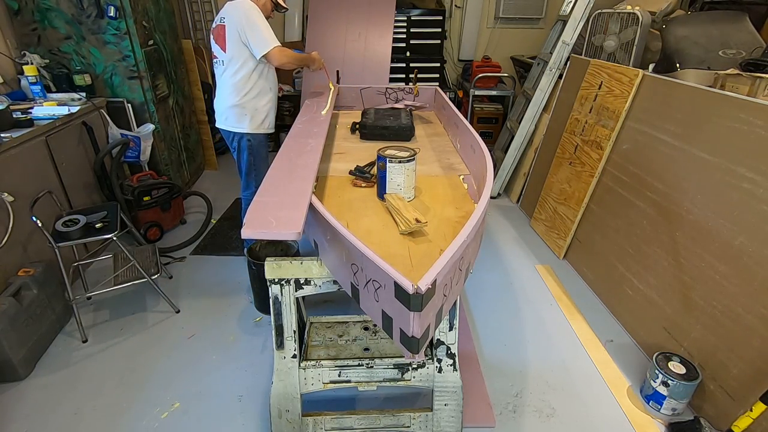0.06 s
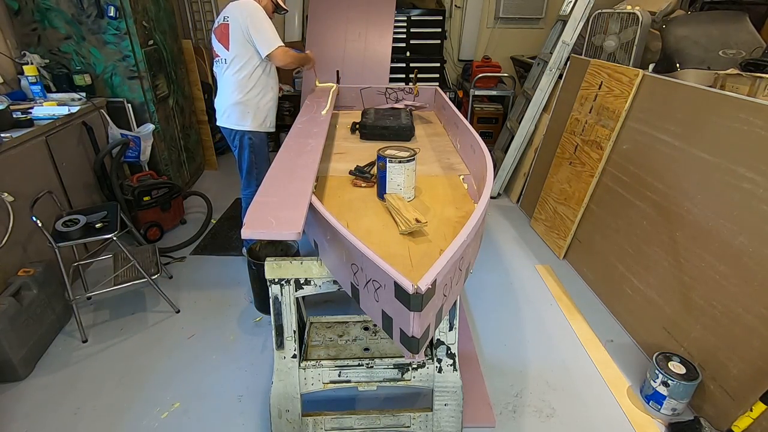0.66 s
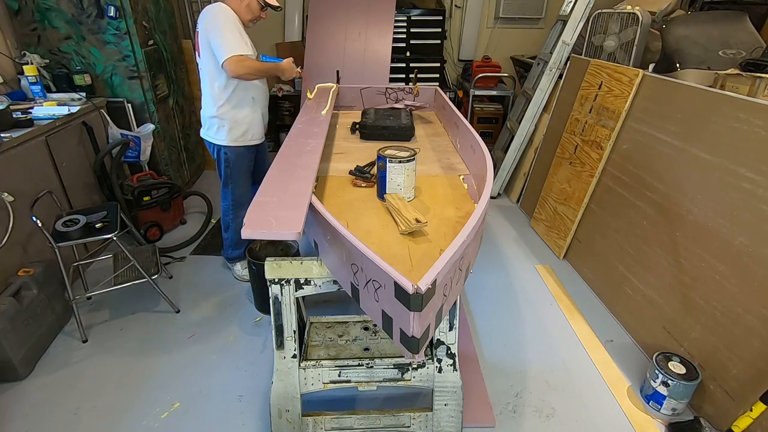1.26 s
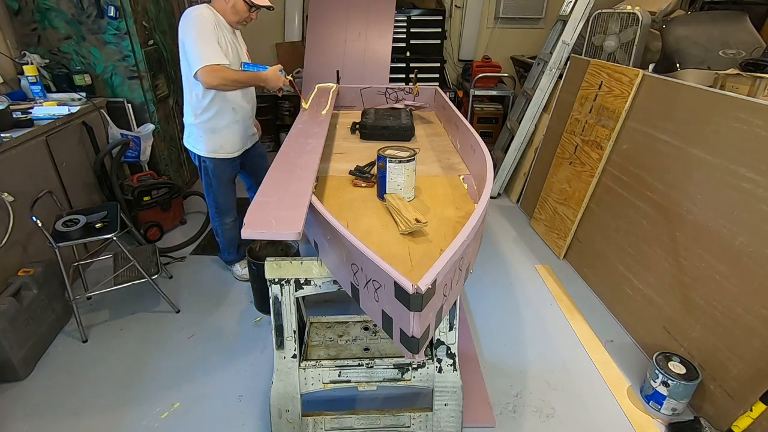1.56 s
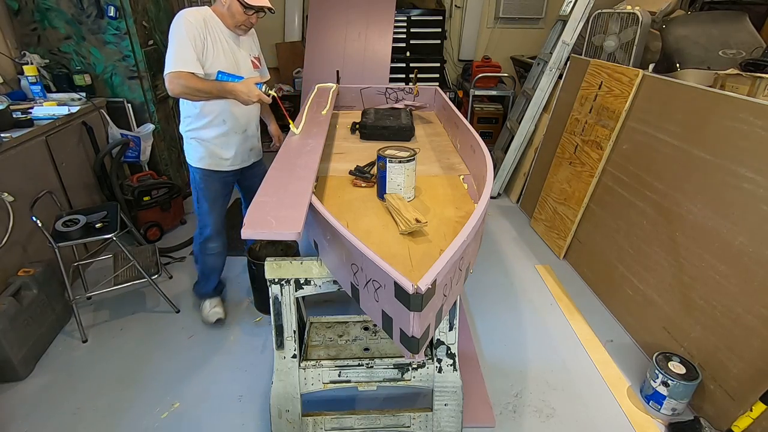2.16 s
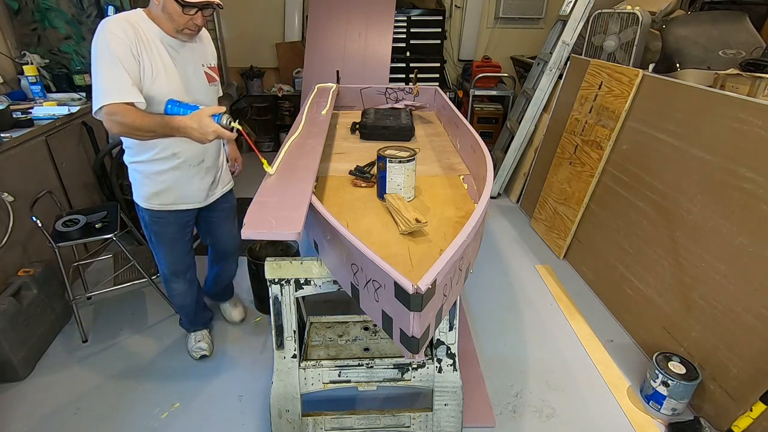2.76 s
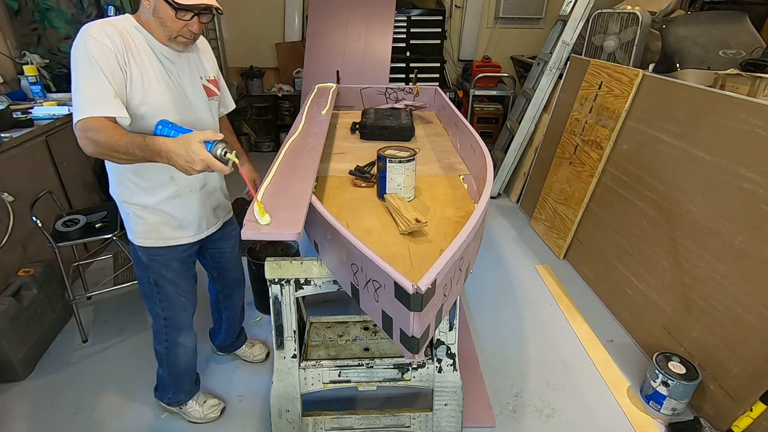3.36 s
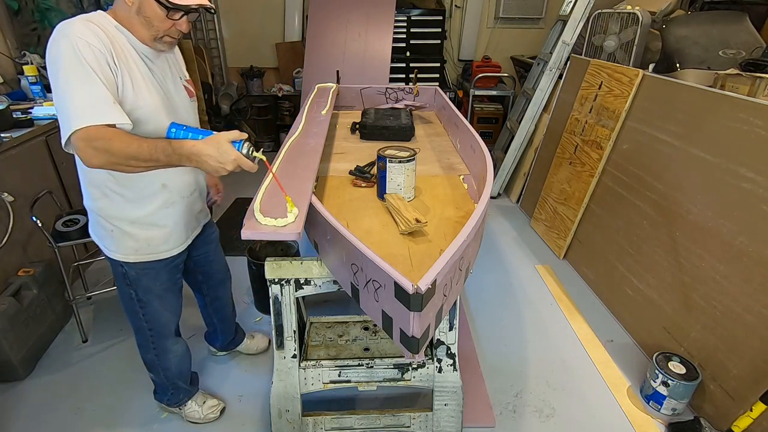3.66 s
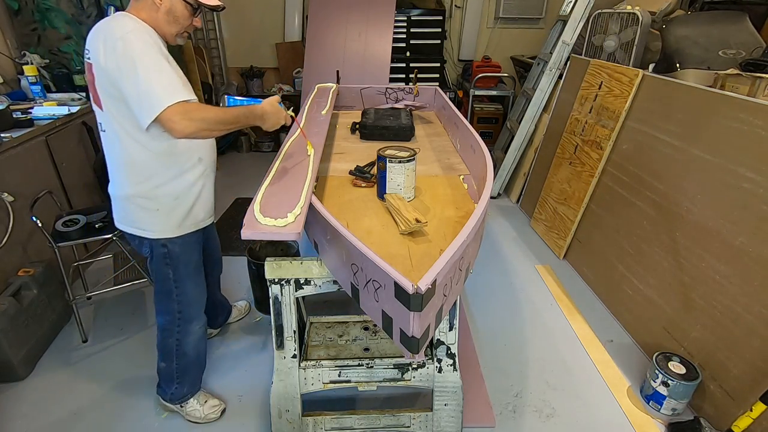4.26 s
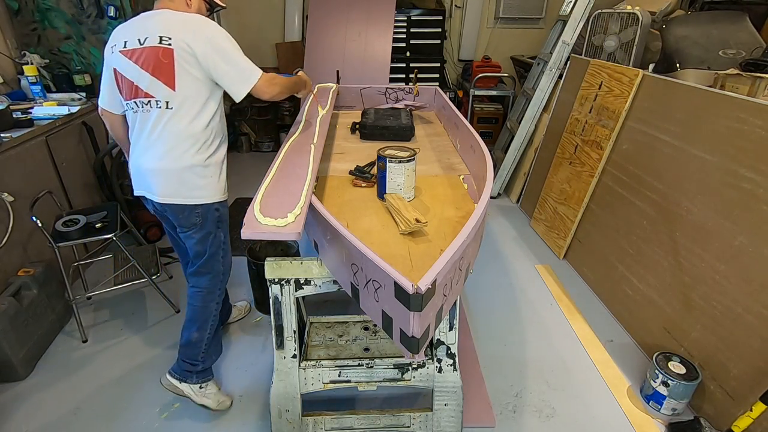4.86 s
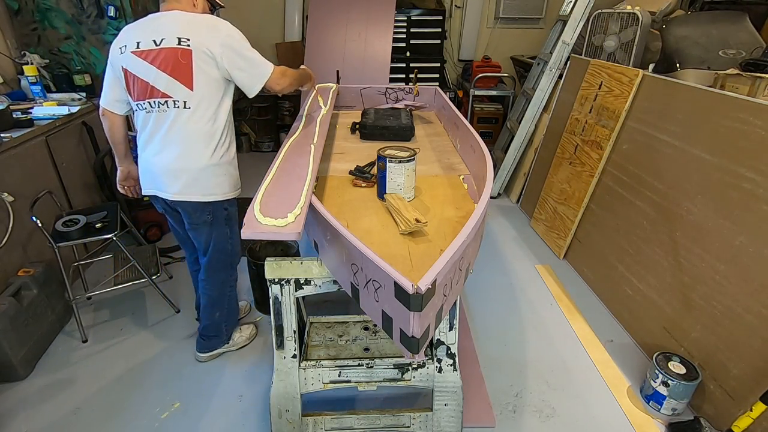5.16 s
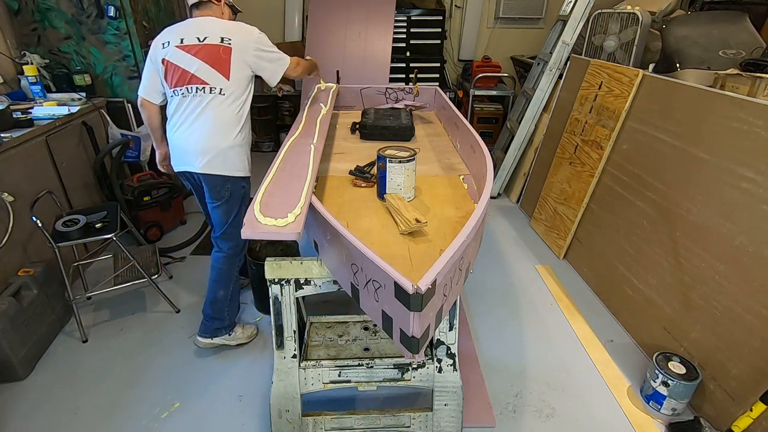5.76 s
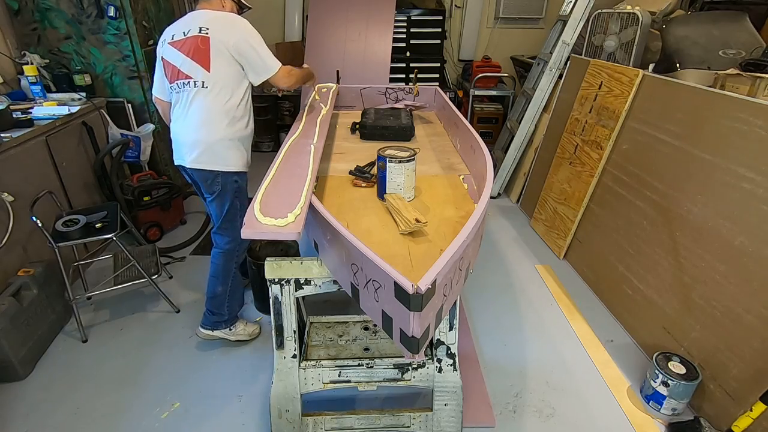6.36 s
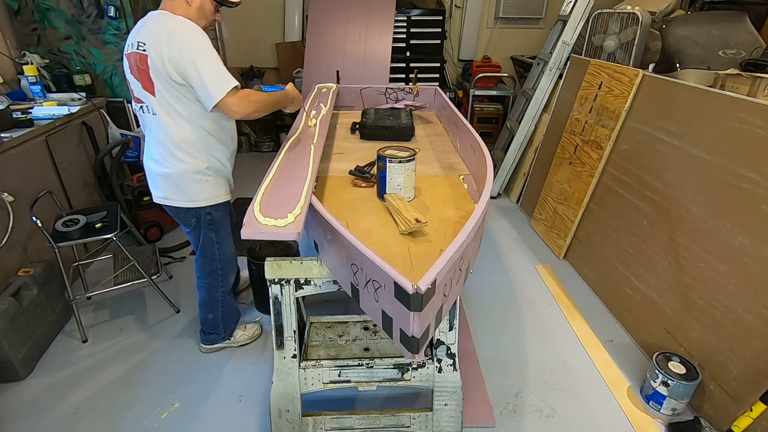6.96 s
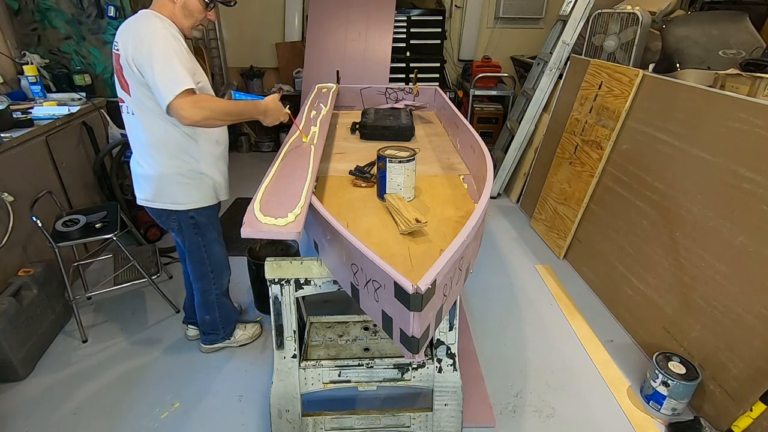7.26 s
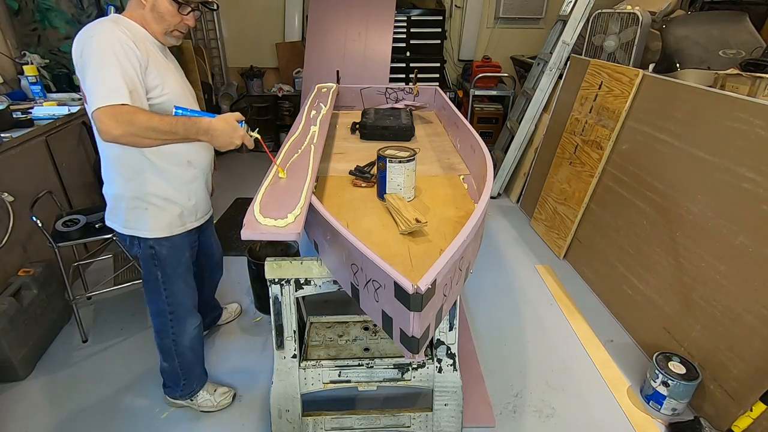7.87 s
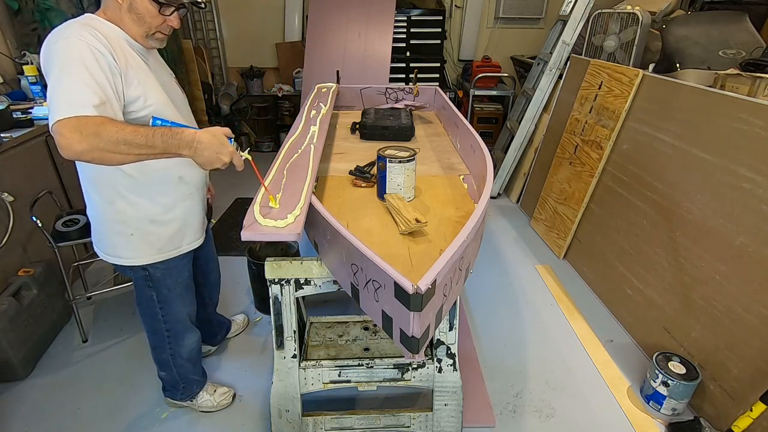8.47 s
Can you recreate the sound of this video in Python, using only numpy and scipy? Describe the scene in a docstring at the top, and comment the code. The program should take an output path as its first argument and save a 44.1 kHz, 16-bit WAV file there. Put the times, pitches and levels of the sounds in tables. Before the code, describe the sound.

Spray foam hisses and sputters through a straw, first steadily and then in short squirts, over a faint fan hum and soft steps.

```python
"""An aerosol can hisses as a man lays a bead of expanding foam along a foam-board boat in a workshop.
Gas rushes out of the straw in one long spray, then in weaker squirts, with a few sudden spits.
The hiss turns hollow as the tip nears the board, and the jet whistles in a dent it blows in the foam.
Gas pockets pop in the straw, shoes pad on the floor and a fan hums in the room."""
import sys
import numpy as np
from scipy import signal
from scipy.fft import rfft, irfft, next_fast_len
from scipy.io import wavfile

SR = 44100
rng = np.random.default_rng(int(sys.argv[2]) if len(sys.argv) > 2 else 0)


def master_out(mix):
    """Clip the mix to full scale and print it as 16-bit PCM to the path in sys.argv[1]."""
    frames = np.transpose(np.atleast_2d(mix))
    ceiling = np.clip(frames, -1, 1)
    pcm = np.round(ceiling * 32767).astype(np.int16)
    wavfile.write(sys.argv[1], SR, pcm)


N = 379701
TIME = np.arange(N) / SR


def from_db(db):
    """Turn decibels into a gain."""
    return np.exp(np.asarray(db) * np.log(10) / 20)


def rms_one(x):
    """Scale a sound to an average (rms) size of 1."""
    return x / np.sqrt(np.mean(x ** 2) + 1e-20)


def in_time(rows):
    """Join a table's rows with straight lines: one curve over time for each value column."""
    times, *columns = np.transpose(rows)
    return [np.interp(TIME, times, column) for column in columns]


def at_hz(rows, hz):
    """Read a table at any frequency, with octaves evenly spaced."""
    frequencies, values = np.transpose(rows)
    return np.interp(np.log(hz), np.log(frequencies), values)


def drift(rate):
    """A smooth random wobble of size 1 that changes about `rate` times a second."""
    step, warm_up = 20, 4000
    r = np.exp(-2 * np.pi * rate * step / SR)
    slow = signal.lfilter([1], [1, -2 * r, r * r], rng.standard_normal(N // step + warm_up + 2))
    slow = rms_one(slow[warm_up:])
    return np.interp(np.arange(N) / step, np.arange(len(slow)), slow)


def swell(start, rise):
    """A puff that peaks at 1 after its rise time and then dies away."""
    age = np.maximum(TIME - start, 0) / rise
    return age * np.exp(1 - age)


def squeeze(start, rise, hold, fall):
    """The valve opens smoothly and stays open, then the flow dies away."""
    opening = np.sin(np.pi / 2 * np.clip((TIME - start) / rise, 0, 1)) ** 2
    return opening * np.exp(-np.maximum(TIME - start - rise - hold, 0) / fall)


def swept_band(x, centre_hz, q, block=128):
    """Keep the sound near a moving pitch; a higher q keeps a narrower band."""
    out, state = np.zeros_like(x), np.zeros((2, 2))
    for i in range(0, N, block):
        angle = 2 * np.pi * centre_hz[i] / SR
        r = np.exp(-angle / (2 * q))
        gain = (1 - r * r) / 2
        feedback = [1, -2 * r * np.cos(angle), r * r]
        out[:, i:i + block], state = signal.lfilter([gain, 0, -gain], feedback, x[:, i:i + block], zi=state)
    return out


# how alike left and right sound (frequency [Hz], likeness [1 same, -1 opposite])
STEREO_LIKENESS = [(60, 0.63), (400, 0.96), (1000, 0.58), (1900, 0.6), (3700, 0.87), (4700, 0.85),
                   (6300, -0.1), (14000, -1)]
def noise_bands():
    """Stereo noise cut into slices a third of an octave wide, as (centre [Hz], noise) pairs."""
    edges = np.geomspace(22, 16500, 30)
    white, bands = rng.standard_normal((2, 2, N)), []
    for k, (low, high) in enumerate(zip(edges, edges[1:])):
        band_filter = signal.butter(2, [low, high], "band", fs=SR, output="sos")
        mid, side = signal.sosfilt(band_filter, white[k % 2])
        hz = np.sqrt(low * high)
        alike = np.clip(at_hz(STEREO_LIKENESS, hz), -1, 1)
        shared = np.sqrt((1 + alike) / 2) * mid
        opposed = np.sqrt((1 - alike) / 2) * np.array([side, -side])
        bands.append((hz, shared + opposed))
    return bands


# tone of the moving air in the room (frequency [Hz], relative level [dB])
AIR_COLOUR = [(25, -10), (60, -13), (85, -5), (105, -16), (140, 2.5), (220, 2.5), (310, -3.5), (420, -16),
              (700, -20.5), (1200, -27), (3000, -44), (7000, -32), (10500, -45), (15000, -56)]
# hum of the fan and the mains (pitch [Hz], level [dB])
HUM_TONES = [(59.2, -68), (211, -65), (310, -72.5)]
def fan(bands, air_db=-55.5, waver=0.42, waver_per_s=2.4):
    """A fan makes a dull rush of air and a few tones that swell and fade."""
    air = rms_one(sum(noise * from_db(at_hz(AIR_COLOUR, hz)) for hz, noise in bands))
    tones = 0
    for hz, db in HUM_TONES:
        phase = 2 * np.pi * hz * TIME
        tone = (1 + waver * drift(waver_per_s)) * np.sin(phase)
        tone += waver * drift(waver_per_s) * np.cos(phase)
        tones += from_db(db) * rms_one(tone)
    return from_db(air_db) * air + tones


# the man's steps (time [s], level [dB])
FOOTSTEPS = [(0.634, -47.5), (1.121, -48), (1.649, -50), (1.88, -49), (2.581, -51), (2.88, -50),
             (3.11, -65), (3.389, -54), (4.056, -53), (5.28, -50), (6.619, -55), (7.15, -62), (8.237, -47)]
def footfalls(floor_hz=60, rise_s=0.027, level_db=-1.0):
    """A soft sole pushes a short, low boom out of the floor."""
    return sum(from_db(db + level_db) * swell(start, rise_s) * np.sin(2 * np.pi * floor_hz * (TIME - start))
               for start, db in FOOTSTEPS)


# how long the room echoes (frequency [Hz], time to fade by 60 dB [s])
ECHO_TIMES = [(100, 0.52), (400, 0.62), (1500, 0.58), (6000, 0.55), (10000, 0.37), (14000, 0.38)]
def workshop(x, bands, direct_db=-3.0, echo_db=-4.5, build_s=0.0028):
    """The room adds fading echoes, whose pattern keeps changing as the man and the can move."""
    size, hop = SR // 2, SR // 10
    count, age = N // size, TIME[:size]
    tails = sum(noise[:, :count * size].reshape(2, count, size) * from_db(-60 * age / at_hz(ECHO_TIMES, hz))
                for hz, noise in bands)
    tails = rms_one(tails * np.minimum(age / build_s, 1)) / np.sqrt(size)
    padded = np.pad(x, ((0, 0), (hop, 2 * hop)), "reflect")
    echoes = np.zeros((2, N + size + 3 * hop))
    fade = signal.windows.cosine(2 * hop)
    for k, i in enumerate(range(0, N + hop, hop)):
        # at each new position, 50 groups of echoes are flipped at random
        signs = rng.choice([-1, 1], 50)[np.arange(size) * 50 // size]
        echo = signal.fftconvolve(padded[:, i:i + 2 * hop] * fade, tails[:, k % count] * signs, axes=1)
        echoes[:, i:i + echo.shape[1]] += echo
    return from_db(direct_db) * x + from_db(echo_db) * echoes[:, hop:hop + N]


# bursting gas pockets (time [s], level [dB], pitch [Hz], spread [octaves], fade [s])
GAS_POCKETS = [(1.860, -32, 200, 0.74, 0.0075), (1.866, -23.5, 4200, 0.25, 0.0017),
               (1.867, -37.5, 560, 0.36, 0.018), (1.884, -35, 400, 0.88, 0.014),
               (1.893, -34, 255, 0.31, 0.018), (2.96, -48.5, 271, 1.1, 0.082),
               (3.201, -45, 480, 0.83, 0.0086), (5.195, -45.5, 430, 0.99, 0.073),
               (5.54, -40, 475, 0.93, 0.05), (5.635, -47, 463, 1.2, 0.033), (6.52, -52.5, 240, 0.7, 0.067),
               (6.79, -52.5, 220, 0.48, 0.078), (6.97, -49, 333, 0.27, 0.009), (7.15, -52, 241, 1.3, 0.11),
               (7.58, -53, 282, 0.38, 0.14)]
def pops(bands, attack_share=0.032):
    """Each gas pocket in the straw bursts with a hollow pop; the shortest ones snap."""
    out = np.zeros((2, N))
    for start, db, pitch_hz, octaves, fade_s in GAS_POCKETS:
        span = slice(int(start * SR), int(start * SR) + SR // 2)
        body = sum(noise[:, span] * np.exp(-.5 * (np.log2(hz / pitch_hz) / octaves) ** 2) / np.sqrt(hz)
                   for hz, noise in bands)
        age = np.maximum(TIME[span] - start, 0) / fade_s
        envelope = (1 - np.exp(-age / attack_share)) * np.exp(-.5 * age ** 2)
        out[:, span] += from_db(db) * envelope * rms_one(body)
    return out


# notes of the hollow in the wet foam (base pitch [Hz], width [Hz], relative level [dB])
HOLLOW_NOTES = [(800, 94, 0.5), (970, 115, -6), (1456, 200, -2.5), (1900, 420, -2.5)]
# its whistles (time [s], rise [s], hold [s], fall [s], level [dB], favoured pitch [Hz], tuning [ratio])
HOLLOW_WHISTLES = [(6.108, 0.083, 0.057, 0.037, -47.5, 1350, 0.99),
                   (6.488, 0.05, 0.047, 0.029, -49.5, 1750, 1.05),
                   (7.388, 0.084, 0.12, 0.04, -50, 760, 1.06), (7.601, 0.064, 0.05, 0.1, -53.5, 990, 1.1),
                   (8.249, 0.12, 0.22, 0.1, -55, 1000, 1.07)]
def hollow(sag_octaves_per_s=0.255):
    """Swirling gas whistles in the hollow under the tip; the pitch sags as the jet widens it."""
    out = np.zeros(N)
    for start, rise, hold, fall, db, favoured_hz, tuning in HOLLOW_WHISTLES:
        span = slice(int(start * SR), int(start * SR) + int(.8 * SR))
        push = from_db(db) * squeeze(start, rise, hold, fall)[span]
        pitch_ratio = tuning * 2 ** (-sag_octaves_per_s * (TIME[span] - start))
        for hz, width_hz, note_db in HOLLOW_NOTES:
            smoother = signal.butter(2, width_hz / 2, fs=SR, output="sos")
            wobble = signal.sosfilt(smoother, rng.standard_normal((2, len(push))))
            phase = 2 * np.pi * hz * np.cumsum(pitch_ratio) / SR
            airy_note = rms_one(wobble[0] * np.cos(phase) + wobble[1] * np.sin(phase))
            drive = from_db(note_db) / (1 + np.log2(hz / favoured_hz) ** 2)
            out[span] += push * drive * airy_note
    return out


# sudden spits of gas (time [s], level [dB], rise [s], extra treble [dB])
GAS_SPITS = [(1.861, -29, 0.018, -6), (3.10, -39, 0.052, 3), (3.80, -35, 0.02, 6), (5.205, -43, 0.03, -2),
             (5.547, -36.5, 0.026, 2.5), (7.15, -38.5, 0.032, 3), (8.401, -39, 0.017, -1)]
def spits(bands):
    """Slugs of pure gas leave the straw as puffs of the spray's hiss, each with its own brightness."""
    out = 0
    for start, db, rise_s, treble_db in GAS_SPITS:
        tilt = [(6000, 0), (11000, treble_db)]
        hiss = sum(noise[:, :SR // 2] * from_db(at_hz(HISS_COLOUR, hz) + at_hz(tilt, hz))
                   for hz, noise in bands)
        looped = np.tile(rms_one(hiss), N // (SR // 2) + 1)[:, :N]
        out += from_db(db) * swell(start, rise_s) * looped
    return out


# flow through the straw in the long spray (time [s], level [dB], high fizz [dB])
LONG_FLOW = [(0.05, -36.5, 0), (0.57, -38.5, -2.5), (0.68, -35, -5.5), (0.9, -36, -2.5), (1.15, -35.5, -1),
             (1.45, -34, 0.5), (1.8, -33, -0.5), (2.28, -33.5, -1.5), (2.58, -32.5, 0.5),
             (2.82, -32.5, -0.5), (3.15, -32.5, 0.5), (3.36, -34.5, 0), (3.68, -34.5, -1.5),
             (3.9, -33.5, 3.5), (4.2, -32.5, 0.5), (4.98, -32.5, -0.5), (5.2, -35.5, -1)]
# ring of the air gap between tip and board (time [s], pitch [Hz], boost [dB])
TIP_GAP = [(0, 3470, 1), (.3, 3050, 2), (.55, 2400, 4.5), (.66, 4870, 0.5), (.9, 4630, 6), (1.2, 4400, 1),
           (1.6, 5670, 0), (2.2, 6500, 0.5), (2.53, 5600, 2.5), (2.85, 5960, -1), (3.08, 4900, 4.5),
           (3.2, 4330, 4), (3.32, 2960, 4), (3.43, 2050, 4), (3.62, 1990, 1.5), (3.77, 2300, 3),
           (3.9, 3130, 2), (4.25, 4430, 2), (4.7, 6300, -0.5), (5.2, 5770, -1)]
# short trigger pulls
# (time [s], rise [s], hold [s], fall [s], level [dB], gap pitch [Hz], low rush [dB], high fizz [dB])
SHORT_PULLS = [(6.017, 0.13, 0.7, 0.03, -53, 3620, 5, 4), (6.103, 0.12, 0.054, 0.02, -44, 1300, 12, 0),
               (6.462, 0.09, 0.043, 0.045, -40, 1900, 5.5, -1),
               (6.55, 0.094, 0.062, 0.23, -45.5, 2600, -0.5, -5),
               (6.721, 0.1, 0.11, 0.28, -38.5, 4700, 3, -6), (6.913, 0.17, 0.11, 0.33, -38.5, 4600, -1, -2),
               (7.19, 0.069, 0.32, 0.31, -43, 1400, 13, 0), (7.932, 0.038, 0.034, 0.69, -47.5, 990, 7, 4.5),
               (8.202, 0.21, 0.25, 0.10, -44.5, 1160, 7, -8)]
def trigger(long_pull_s=5.235, valve_close_s=0.12, long_rush_db=1):
    """Trigger pulls set the jet's strength and tone; where they overlap, the stronger one counts more."""
    flow_db, long_fizz_db = in_time(LONG_FLOW)
    long_gap_hz, boost_db = in_time(TIP_GAP)
    long_pull = from_db(flow_db) * np.exp(-np.maximum(TIME - long_pull_s, 0) / valve_close_s)
    powers = [long_pull ** 2 + 1e-20]
    colours = [(np.log(long_gap_hz), long_rush_db, long_fizz_db)]
    for start, rise, hold, fall, db, gap_hz, rush_db, fizz_db in SHORT_PULLS:
        powers.append((from_db(db) * squeeze(start, rise, hold, fall)) ** 2)
        colours.append((np.log(gap_hz), rush_db, fizz_db))
    total = sum(powers)
    log_gap, rush_db, fizz_db = (sum(power * value for power, value in zip(powers, column)) / total
                                 for column in zip(*colours))
    return np.sqrt(total), np.exp(log_gap), boost_db * powers[0] / total, rush_db, fizz_db


# tone of the gas leaving the straw (frequency [Hz], relative level [dB])
HISS_COLOUR = [(180, -31), (300, -20.5), (400, -14.5), (540, -12), (800, -7.5), (1200, -6.5), (2100, -3),
               (4000, -4), (5300, -3.5), (6500, 8), (8500, -17), (10000, -5), (11800, -23), (14500, -39)]
def spray(bands, level_db=2.0, gap_q=1.57, muffle_db_per_octave=3,
          sputter_db=1.0, flicker_db=1.5, extra_fizz_db=1.0):
    """The jet hisses and the board adds a low rush; the gap rings at one pitch and muffles those above."""
    strength, gap_hz, boost_db, rush_db, fizz_db = trigger()
    hiss, power = 0, 0
    for hz, noise in bands:
        rush_share = at_hz([(200, 1.0), (1100, 0.92), (3200, 0.068)], hz)
        fizz_share = at_hz([(5800, 0.029), (10000, 1.3), (14000, 2.4)], hz)
        colour_db = at_hz(HISS_COLOUR, hz) + rush_share * rush_db + fizz_share * (fizz_db + extra_fizz_db)
        octaves_above_gap = np.maximum(np.log2(hz / gap_hz), 0)
        gain = from_db(colour_db - muffle_db_per_octave * octaves_above_gap)
        power += np.mean(noise ** 2) * gain ** 2
        hiss += noise * gain * from_db(flicker_db * drift(rate=19))
    jet = hiss / np.sqrt(power)
    jet += (from_db(boost_db) - 1) * swept_band(jet, gap_hz, gap_q)
    # froth in the straw chokes the whole jet in quick, uneven flutters
    return (strength * jet + hollow()) * from_db(level_db + sputter_db * drift(rate=180))


def scene(close_pop_db=-11.5):
    """The can sounds in the workshop, over the fan and the steps."""
    jet_noise = noise_bands()
    room_noise = [(hz, np.roll(noise, N // 2, axis=1)) for hz, noise in jet_noise]
    hiss_noise = jet_noise[7:]   # no deep bass
    bursts = pops(jet_noise)
    can = spray(hiss_noise) + bursts + spits(hiss_noise)
    close_pops = from_db(close_pop_db) * bursts   # the pops echo less than the hiss
    return workshop(can, room_noise) + close_pops + fan(room_noise) + footfalls()


# how the two microphones differ (frequency [Hz], left minus right [dB])
MIC_BALANCE = [(300, -0.5), (1100, 2), (2700, 0.5), (4000, -.5), (5200, -5), (6400, -11.5), (7500, -9),
               (8800, -1), (10200, -4), (12000, 0), (14000, -2.5)]
# fine treble shaping of the whole sound: slight peaks near 6.8 and 9.5 kHz,
# slight dips near 5.5 and 8.2 kHz (frequency [Hz], gain [dB])
TREBLE_COLOUR = [(3000, 0), (4200, 0.55), (5000, 0.4), (5500, -1.46), (6300, 0.4), (6800, 1.5),
                 (8200, -1.8), (9500, 2.5), (11000, -0.5)]
def record(dry, cutoff_hz=14950):
    """The treble is louder on the right and has slight peaks and dips; the very top is cut."""
    size = next_fast_len(N + SR // 10)
    hz = np.maximum(np.arange(size // 2 + 1) * SR / size, 1)
    balance = from_db(at_hz(MIC_BALANCE, hz) * np.array([[.5], [-.5]]))
    balance /= np.sqrt(np.mean(balance ** 2, axis=0))
    heard = irfft(rfft(dry, size) * balance * from_db(at_hz(TREBLE_COLOUR, hz)), size)[:, :N]
    return signal.sosfilt(signal.ellip(10, .2, 90, cutoff_hz, fs=SR, output="sos"), heard)


dry = scene()
out = record(dry)
master_out(out)
```